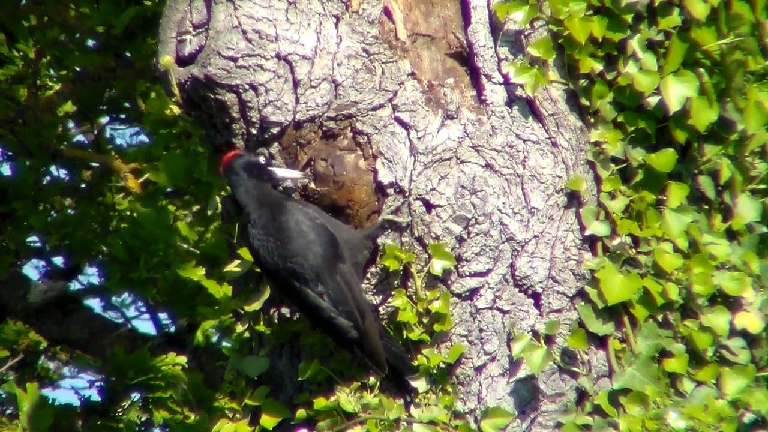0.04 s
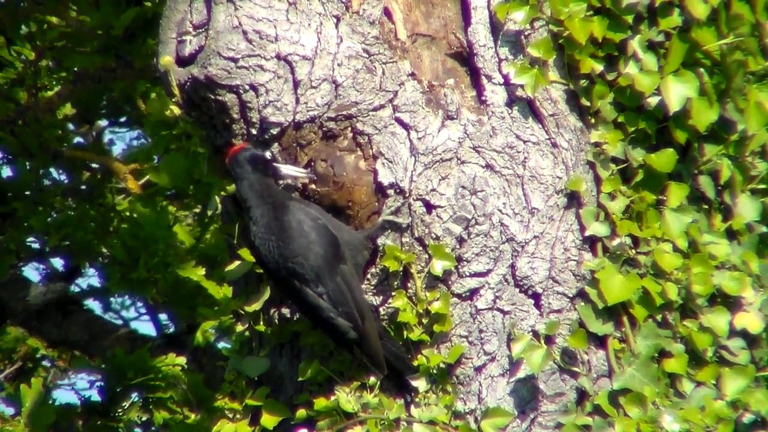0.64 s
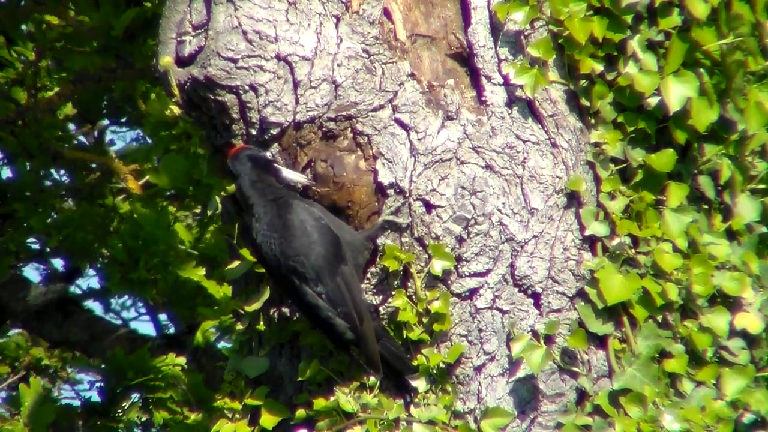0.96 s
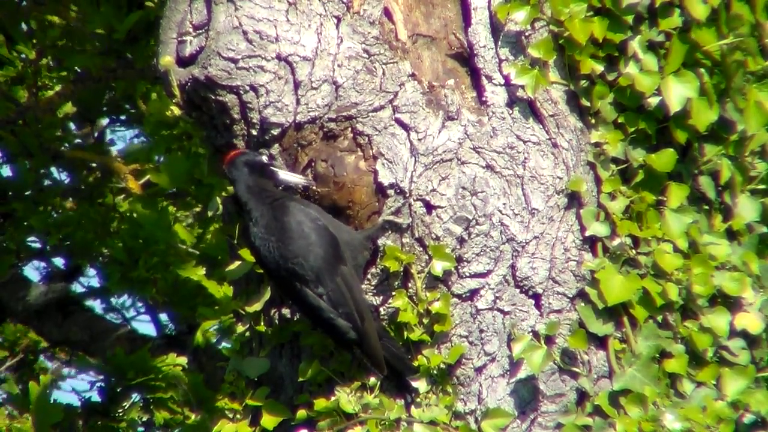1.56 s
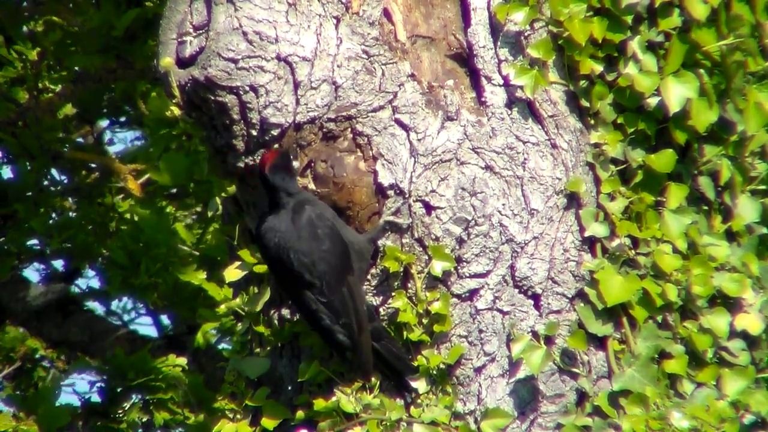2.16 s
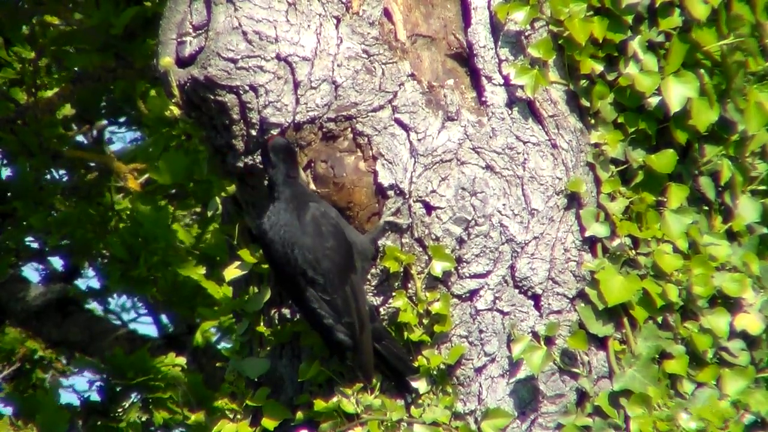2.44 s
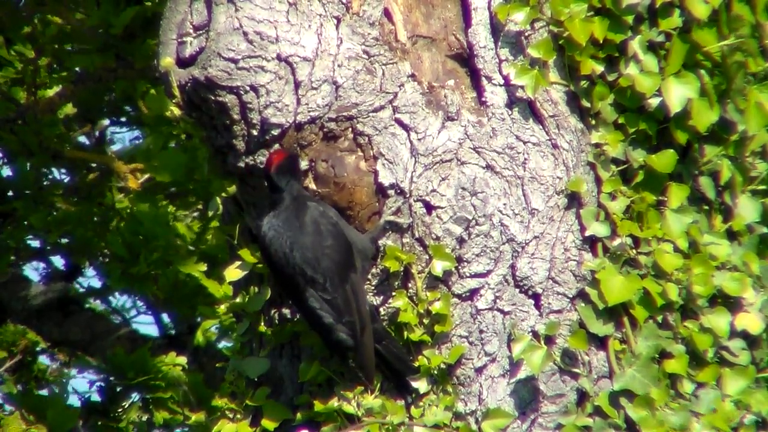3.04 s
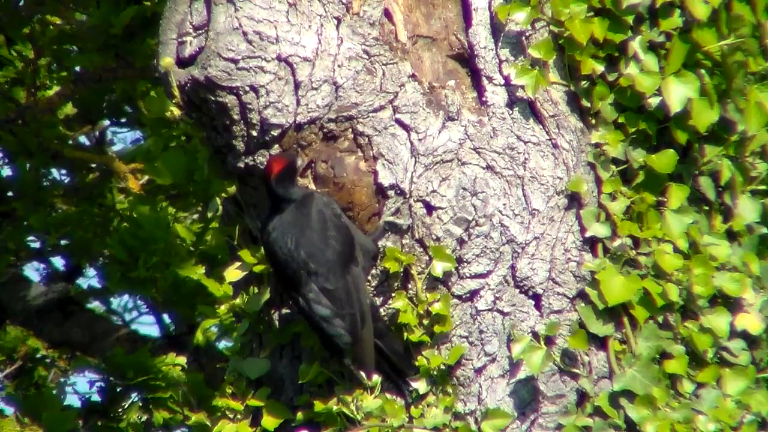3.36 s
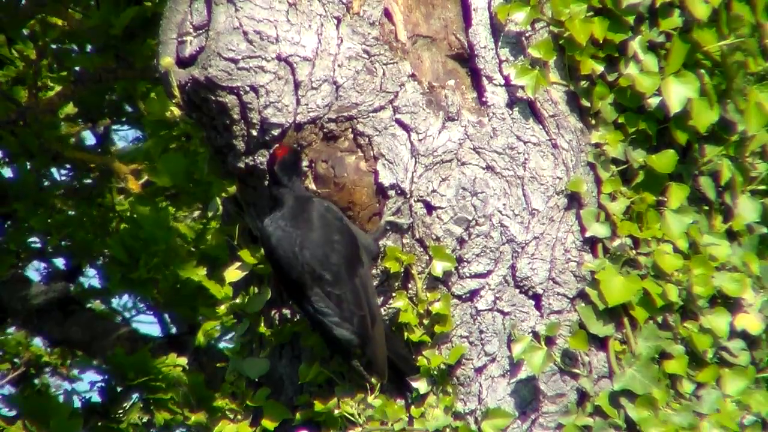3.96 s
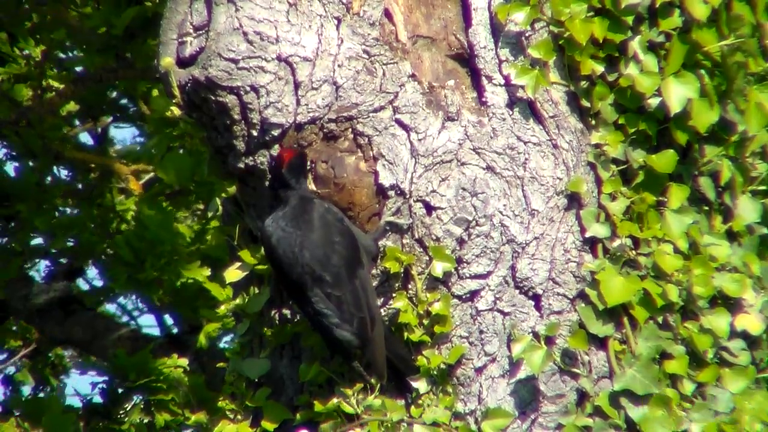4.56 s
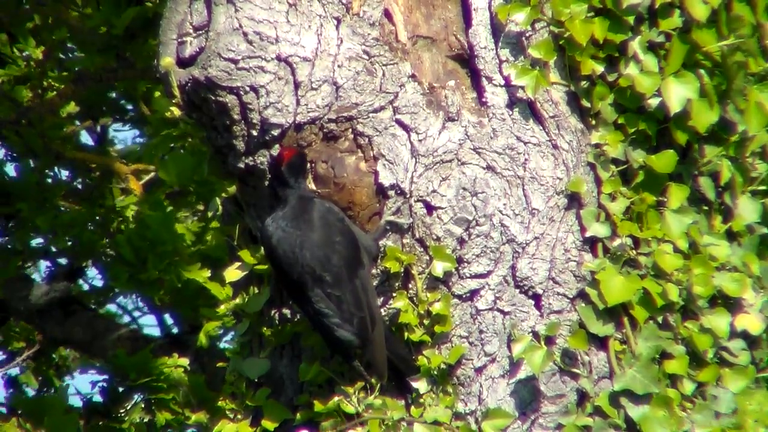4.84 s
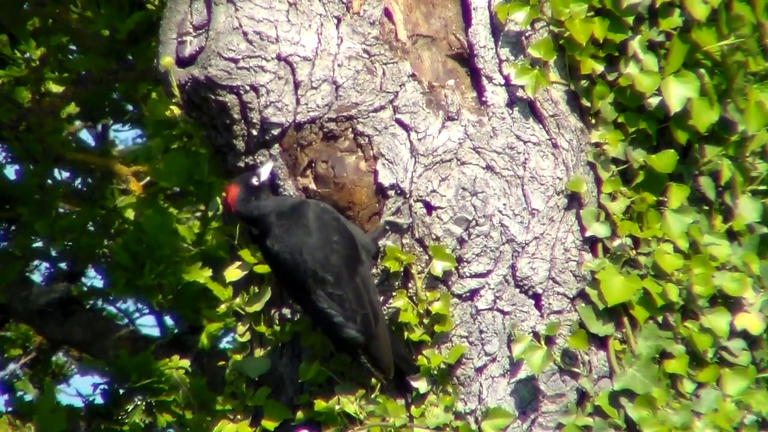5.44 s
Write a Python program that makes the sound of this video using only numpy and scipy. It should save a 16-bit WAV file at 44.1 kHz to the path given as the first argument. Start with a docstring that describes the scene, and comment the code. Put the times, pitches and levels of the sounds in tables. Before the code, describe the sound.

Short buzzy chirps and distant bird whistles over a low outdoor rumble, followed by a rapid, scratchy scolding chatter fading into the trees.

```python
"""A leafy garden, over a low rumble and a faint hum. From the start a small bird repeats buzzy chirps,
each note an arch of pitch that flares in its throat resonance, while other birds whistle far off.
Near 2 s comes one faint hoot. From 3.8 s a bird scolds in dry, harsh bursts of syrinx pulses; as it
slows and recedes, a diffuse wash of the chatter's echo swells and settles over faint far birdsong.
Leaves and trees scatter the chirps, whistles and chatter into a soft tail."""
import sys
import numpy as np
from scipy import signal
from scipy.fft import rfft, irfft, next_fast_len
from scipy.io import wavfile
from scipy.ndimage import uniform_filter1d, map_coordinates

SR = 44100
rng = np.random.default_rng(int(sys.argv[2]) if len(sys.argv) > 2 else 0)


def output_pcm(signal):
    """Save a mono or channel-first signal as 16-bit PCM at the path in sys.argv[1].

    Samples are clipped to [-1, 1] before scaling.
    """
    pcm = np.clip(np.atleast_2d(signal).T, -1, 1) * 32767
    wavfile.write(sys.argv[1], SR, np.round(pcm).astype(np.int16))


N = 247401

# tone of the outdoor rumble and hiss [f/Hz, relative level/dB]
AIR_EQ = [(12, -28), (20, -12), (43, -2), (110, -4), (154, -8), (739, -14), (1390, -17.5), (2170, -16),
          (3560, -24.5), (4200, -12.5), (4560, -15), (5380, -24.5), (8360, -24.5), (12000, -25),
          (14500, -31)]
# partials of the low hum [f/Hz, level/dB]
HUM_PARTIALS = [(25, -55.5), (50, -62), (100, -67.5)]
# tone of the noise wash that plays faint far birdsong and the chatter's echo [f/Hz, relative level/dB]
WASH_EQ = [(1500, -40), (2400, -2.5), (3400, 3), (4400, -2.5), (5600, 0), (6800, -14), (9000, -19)]
# fader ride on the wash; the swell near 4.5 s is the chatter's diffuse echo [t/s, relative level/dB]
WASH_RIDE = [(0, -47.5), (2.8, -47.5), (3.6, -46.5), (4.45, -38.5), (5.0, -45), (5.6, -48.5)]
# stereo image of the noise beds [f/Hz, left-right likeness]
BED_LIKENESS = [(30, 0), (60, 0.46), (130, 0.27), (300, 0.34), (700, 0.4), (1400, 0.37), (3500, 0.56),
                (7000, 0), (14000, 0)]
# stereo image of the reverb [f/Hz, left-right likeness]
TAIL_LIKENESS = [(1400, 0.76), (3500, 0.35), (5000, 0.46), (7000, -0.73)]
# reverb time among the trees [f/Hz, t60/s]
TREE_DECAY = [(1000, 0.4), (4000, 0.58), (7000, 0.85), (12000, 0.19)]
# slaps off the trunk and the ground [delay/s, level/dB, side -1..1]
SLAPS = [(0.0142, -16, 0.22), (0.0238, -11, 0.07)]
# phase gap between the two microphone ports [f/Hz, phase/rad]
PORT_PHASE = [(1000, .08), (3500, 0.1), (5000, 0.9), (6300, 1.15), (7500, 1.33), (9000, 2), (12000, 1.34)]
# lean of the direct sound [f/Hz, left over right/dB]
LEFT_LEAN = [(1000, 1.5), (4000, 0.1), (8000, 0.3), (12000, 3)]
# the clearest far whistles [t/s, length/s, first f/Hz, middle f/Hz, last f/Hz, relative level/dB]
CLEAR_WHISTLES = [ (0.235, 0.056, 3410, 2670, 1970, -55), (.355, 0.072, 2590, 2494, 2490, -50),
                  (0.534, .18, 3230, 2295, 1950, -56.5), (0.799, .14, 3650, 3320, 2435, -48.5),
                  (1.225, .15, 1950, 1933, 1880, -60.5), (1.736, .11, 3800, 3386, 3750, -43),
                  (1.857, .08, 6020, 5520, 5500, -52), (2.679, .065, 4200, 3775, 2840, -46),
                  (3.045, 0.23, 2040, 2288, 2444, -55.5), (3.189, .17, 1600, 1687, 1656, -58),
                  (3.242, 0.079, 2590, 2558, 2556, -45), (3.436, .092, 3450, 3040, 2770, -39.5),
                  (3.67, .26, 1730, 1852, 2170, -55.5), (4.515, 0.088, 3630, 3633, 3630, -37.5),
                  (4.668, .075, 2640, 3100, 2730, -42.5), (4.733, 0.097, 2650, 2500, 2640, -46.5),
                  (5.278, 0.125, 3596, 3526, 3470, -50), (5.389, .042, 4590, 3590, 2360, -50),
                  (5.543, .04, 4530, 3700, 2920, -47), ]
# the chirping bird's five notes by name
# [rise/s, hold/s, top f/Hz, dip as share of the top, rebound 0-1, accent/dB, trim/dB]
NOTE_SHAPES = { "high": (.018, .021, 4900, .72, .55, 6.5, .8),
               "hook": (.022, .004, 4600, .71, .65, 8.5, -.5), "tail": (.022, 0, 4350, .85, 0, 0, -2),
               "peak": (.02, .007, 4980, .76, .15, 2, .3), "drop": (.02, 0, 4350, .77, .1, 4.5, -1.3), }
# the notes of each phrase [note names in order]
PHRASE_NOTES = {"long": ["high", "hook", "tail"], "short": ["peak", "drop"]}
# chirps, cued where the first note turns down
# [t/s, phrase, relative level/dB, pitch ratio, relative level of the lead-in buzz/dB]
CHIRP_CUES = [ (-.034, "short", -34.5, 1.057, -55), (.197, "long", -32, 1, -41),
              (.608, "short", -33, 1.003, -51), (.923, "long", -33.5, 0.98, -45.5),
              (1.25, "short", -32.5, 1.03, -51.5), (1.508, "long", -33.3, .98, -37.5),
              (2.206, "short", -34, 0.98, -57), (3.073, "long", -32, .985, -38),
              (3.478, "long", -31, 0.97, -36), (3.646, "short", -29, 1.036, -48), ]
# beak colour on the chirps' overtones [f/Hz, gain/dB]
BEAK_EQ = [(6000, -9), (7400, -8.5), (8500, -22), (9600, -3.5), (11000, -1), (13000, -10)]
# tone of the hiss on the chirps [f/Hz, relative level/dB]
SIZZLE_EQ = [(1200, -8), (2000, 0), (5000, 5.5), (7300, 4), (8600, -3), (10000, 3), (12500, -19),
             (14000, -21)]
# starts of the chatter notes, growing slower and less even [t/s]
CHATTER_CUES = [3.772, 3.812, 3.858, 3.903, 3.948, 3.997, 4.053, 4.107, 4.162, 4.233, 4.294, 4.346, 4.415,
                4.488, 4.552, 4.611, 4.684, 4.76, 4.888, 4.928, 5.006, 5.062, 5.133, 5.221, 5.278, 5.369,
                5.444, 5.552]
# the scolding throat, close and in the open [f/Hz, relative level/dB]
OPEN_EQ = [(450, -17), (750, -5.5), (1150, -5), (1600, -8), (1950, -7.5), (2400, -3.5), (3200, -9),
           (4300, -3), (5700, -0.5), (6500, -1), (7900, -0.5), (8900, -11), (11500, -5.5), (14000, -28)]
# the same voice, muffled deep in the trees [f/Hz, relative level/dB]
DEEP_EQ = [(500, -25), (1000, -9), (1600, -8.5), (2200, -7.5), (3000, 1.5), (4200, 0), (5500, 3.5),
           (6300, -3), (7500, -16), (9000, -14), (12000, -33), (14000, -40)]
# the scolding swells, then recedes [t/s, relative level/dB, depth in the trees 0-1]
SCOLD_RIDE = [(3.77, -49, 0.14), (3.85, -32, 0.38), (4.13, -23.5, 0.01), (4.24, -28.5, 0.44),
              (4.56, -35.5, 0.83), (5.03, -38, 1), (5.45, -44.5, 0.85)]


def amp(db):
    """Decibels to gain."""
    return 10 ** (np.asarray(db) / 20)


def unit(x):
    """Scale to rms 1."""
    return x / np.sqrt(np.mean(x ** 2) + 1e-20)


def along(points, hz):
    """Read a curve of (f/Hz, value) points on a log frequency axis."""
    freqs, values = np.transpose(points)
    return np.interp(np.log(hz + 1), np.log(freqs + 1), values)


def wobble(rate, size):
    """A smooth random modulator, rate knots a second."""
    knots = rng.standard_normal(int(size * rate / SR) + 4)
    return map_coordinates(knots, [np.arange(size) * rate / SR])


def filtered(x, response):
    """Shape x by a gain that is a function of frequency."""
    size = x.shape[-1]
    padded = next_fast_len(size + 2048)
    return irfft(rfft(x, padded) * response(np.fft.rfftfreq(padded, 1 / SR)), padded)[..., :size]


def eq(x, curve):
    """Equalise by a curve of (f/Hz, gain/dB) points."""
    return filtered(x, lambda hz: amp(along(curve, hz)))


def add(track, s, sound):
    """Mix a sound in at time s."""
    i = round(s * SR)
    sound = sound[..., max(-i, 0):max(N - i, 0)]
    track[..., max(i, 0):max(i, 0) + sound.shape[-1]] += sound


def phase_of(hz):
    """Running phase of a pitch curve."""
    return 2 * np.pi * np.cumsum(hz) / SR


def spread(pair, likeness):
    """Two unrelated signals become left and right of the given likeness."""
    turn = lambda hz: np.arccos(np.clip(along(likeness, hz), -1, 1)) / 2
    mid, side = filtered(pair, lambda hz: np.array([np.cos(turn(hz)), np.sin(turn(hz))]))
    return np.array([mid + side, mid - side])


def noise_bed(colour, patchy_db):
    """Stereo noise of rms 1, mottled with patches of random gain."""
    bins = signal.stft(rng.standard_normal((2, N)), nperseg=1024)[2]
    patches = uniform_filter1d(rng.standard_normal(bins.shape[1:]), size=4, axis=0)
    patches = uniform_filter1d(patches, size=7, axis=1)
    pair = signal.istft(bins * amp(patchy_db * unit(patches)), nperseg=1024)[1][:, :N]
    return unit(eq(spread(pair, BED_LIKENESS), colour))


def ambience(air_db=-53, wash_trim_db=-4):
    """The bed: low hum, outdoor rumble and hiss, and a noise wash ridden up as the chatter's echo."""
    hum = sum(amp(db) * np.sqrt(2) * np.sin(phase_of(hz * (1 + 0.0055 * wobble(5.12, N))))
              for hz, db in HUM_PARTIALS)
    ride_db = np.interp(np.arange(N) / SR, *np.transpose(WASH_RIDE))
    wash = amp(wash_trim_db + ride_db) * noise_bed(WASH_EQ, patchy_db=7)
    return amp(air_db) * noise_bed(AIR_EQ, patchy_db=1.5) + wash + hum


def foliage_reverb(x, decay, onset_s):
    """Scatter off foliage: a noise tail that builds over onset_s and dies band by band."""
    hz, t, bins = signal.stft(rng.standard_normal((2, SR * 2 // 3)), SR, nperseg=128)
    bins = bins * amp(-60 * t / along(decay, hz)[:, None]) * (1 - np.exp(-t / onset_s))
    tail = spread(signal.istft(bins, SR, nperseg=128)[1], TAIL_LIKENESS)
    return signal.fftconvolve(x[None], tail / np.linalg.norm(tail[0]), axes=1)[:, :N]


def slapback(x):
    """Trunk and ground each throw the sound back once, a moment later."""
    out = np.zeros((2, N))
    for delay, db, side in SLAPS:
        add(out, delay, amp(db) * np.array([[1 + side], [1 - side]]) * x)
    return out


def direct_path(x):
    """The straight path reaches the two microphone ports out of step, the left a little louder."""
    half = np.array([[.5], [-.5]])
    lean = lambda hz: amp(half * along(LEFT_LEAN, hz))
    return filtered(x, lambda hz: np.exp(1j * half * along(PORT_PHASE, hz)) * lean(hz))


def hoot(start_s=1.88, length_s=.5, pitch_hz=563, level_db=-65):
    """One soft, far hoot on a nearly steady pitch."""
    out = np.zeros(N)
    u = np.linspace(0, 1, int(length_s * SR))
    pitch = pitch_hz * (1 + 0.0054 * wobble(21, len(u)))
    envelope = amp(level_db) * np.sqrt(2 * np.abs(np.sin(np.pi * u)))
    add(out, start_s, envelope * np.sin(phase_of(pitch)))
    return out


def faint_whistle_cues(count=12, length_s=.048, pitch_hz=3070, slide_oct=-.6):
    """Faint whistles strewn over the scene, most sliding down; rows as in CLEAR_WHISTLES."""
    starts = (np.arange(count) + rng.random(count)) * N / SR / count
    rows = []
    for s, (long, high, steep, loud) in zip(starts, rng.standard_normal((count, 4))):
        hz = pitch_hz * 2 ** (.25 * high)
        slide = 2 ** ((slide_oct + .25 * steep) / 2)
        rows.append((s, length_s * np.exp(.25 * long), hz / slide, hz, hz * slide, -54.5 + 2 * loud))
    return rows


def whistles(waver=0.0081, hoarse=0.014, flutter_db=3.5):
    """Far songbirds: each note bends through three pitches, a little hoarse and unsteady."""
    out = np.zeros(N)
    for s, length, first, middle, last, db in CLEAR_WHISTLES + faint_whistle_cues():
        u = np.linspace(0, 1, int(length * SR))
        bend = np.polyval(np.polyfit([0, .5, 1], [first, middle, last], 2), u)
        pitch = bend * (1 + waver * wobble(193, len(u)) + hoarse * wobble(891, len(u)))
        envelope = amp(db + flutter_db * wobble(120.6, len(u))) * np.sqrt(2 * np.abs(np.sin(np.pi * u)))
        add(out, s, envelope * np.sin(phase_of(pitch)))
    return out


def chirp_notes(step_s=.056):
    """Every chirp unrolled into evenly spaced notes [t/s, shape, relative level/dB, pitch ratio]."""
    return [(s + k * step_s, NOTE_SHAPES[name], db + NOTE_SHAPES[name][-1], ratio)
            for s, phrase, db, ratio, _ in CHIRP_CUES for k, name in enumerate(PHRASE_NOTES[phrase])]


def sizzle(trim_db=-22, length_s=0.082):
    """A thin hiss rides on every chirp note."""
    out = np.zeros(N)
    u = np.linspace(0, 1, int(length_s * SR))
    for s, _, db, _ in chirp_notes():
        hiss = unit(eq(rng.standard_normal(len(u)), SIZZLE_EQ))
        add(out, s - length_s / 2, amp(db + trim_db) * np.sin(np.pi * u) * hiss)
    return out


def buzzes(octave_hz=6244, length_s=.06, overlap_s=.009, rough=0.056, climb=0.065, trim_db=-1):
    """A rough, rising squeeze leads into each chirp; its octave is stronger than its fundamental."""
    out = np.zeros(N)
    u = np.linspace(0, 1, int(length_s * SR))
    for s, phrase, _, _, db in CHIRP_CUES:
        rise, hold = NOTE_SHAPES[PHRASE_NOTES[phrase][0]][:2]
        phase = phase_of(octave_hz * (1 + climb * (u - .5) + rough * wobble(2602, len(u))))
        buzz = unit(np.sin(phase) + amp(-11) * np.sin(phase / 2))
        start = s - rise - hold - length_s + overlap_s
        add(out, start, amp(db + trim_db) * np.sin(np.pi * u ** 1.4) * buzz)
    return out


def arch(rise, hold, top_hz, dip, rebound, fall_s=0.00671, rebound_s=0.00688, sag_s=0.0129):
    """Time from the turn and pitch of one note: it rises, holds, falls, springs back and sags."""
    knots = np.cumsum([0, rise, hold, fall_s, rebound_s, sag_s]) - rise - hold
    t = np.arange(knots[0], knots[-1], 1 / SR)
    share_of_top = np.interp(t, knots, [.73, 1, 1, dip, dip + rebound * (1 - dip), dip - 0.089])
    return t, top_hz * uniform_filter1d(share_of_top, size=160)


def chirps(throat_hz=3860, width_hz=520, throat_db=3.5, swell_db_per_s=179, decay_db_per_s=97):
    """The fundamental flares as it sweeps through the throat resonance; overtones flicker above it."""
    tones, highs = np.zeros(N), np.zeros(N)
    for s, (rise, hold, top_hz, dip, rebound, accent_db, _), db, ratio in chirp_notes():
        t, hz = arch(rise, hold, top_hz * ratio, dip, rebound)
        phase = phase_of(hz * (1 + 0.014 * wobble(499, len(t))))
        ring_db = throat_db * (np.exp(-((hz - throat_hz) / width_hz) ** 2) - 1)
        push_db = accent_db * np.exp(-((t - 0.0028) / 0.0033) ** 2)  # a push during the fall
        swell_db = np.minimum(swell_db_per_s * t, -decay_db_per_s * t)  # peaks at the turn
        edges = np.clip(np.minimum(t - t[0], t[-1] - t) / 0.0021, 0, 1)
        envelope = np.sqrt(2) * edges * amp(db + 3 * wobble(380, len(t)))
        rasp = amp(-18) * wobble(1800, len(t))  # noisy sidebands that follow the pitch
        add(tones, s + t[0], envelope * (amp(ring_db + push_db + swell_db) + rasp) * np.sin(phase))
        overtones = amp(-21) * np.sin(2 * phase) + amp(-32) * np.sin(3 * phase)
        add(highs, s + t[0], envelope * amp(4 * wobble(250, len(t))) * overtones)
    return tones + eq(highs, BEAK_EQ)


def chatter(pitch_hz=1620, shake_hz=185, length_s=.033, scatter_open=0.025, scatter_deep=0.39):
    """Bursts of sharp syrinx pulses, shaken fast in pitch and strength: clear and scattered stems."""
    clear, scattered = np.zeros(N), np.zeros(N)
    times, levels, depths = np.transpose(SCOLD_RIDE)
    for s in CHATTER_CUES:
        db, depth = np.interp(s, times, levels), np.interp(s, times, depths)
        size = int(length_s * (1 + 0.27 * depth ** 2) * SR)  # deeper notes are drawn out
        swell = np.abs(np.sin(np.pi * np.linspace(0, 1, size) ** 0.6)) ** 1.24
        shake_phase = phase_of(shake_hz * (1 + 0.266 * wobble(120.9, size)))
        shake = np.sin(shake_phase + rng.uniform(0, 2 * np.pi))
        jitter = 0.0803 * wobble(148.7, size) + 0.05 * wobble(1415, size)
        phase = phase_of(pitch_hz * (1 + 0.16 * shake + jitter))
        # the overtones swell and fade on their own, which gives the scratch
        pulses = unit(sum(amp(3.5 * wobble(250, size)) * np.cos(k * phase) for k in range(1, 10)))
        source = (pulses + 0.19 * rng.standard_normal(size)) * (1 + 0.36 * shake)
        colour = lambda hz: amp((1 - depth) * along(OPEN_EQ, hz) + depth * along(DEEP_EQ, hz))
        note = amp(db) * swell * unit(filtered(source, colour))
        share = scatter_open + depth * (scatter_deep - scatter_open)  # what the leaves scatter
        add(clear, s, np.sqrt(1 - share) * note)
        add(scattered, s, np.sqrt(share) * note)
    return clear, scattered


def scene():
    """The mix: near leaves give the calls a quick scatter, the farther trees a long soft tail."""
    song = chirps() + buzzes() + sizzle()
    far = whistles()
    clear, scattered = chatter()
    direct = direct_path(song + clear + amp(-0.5) * far)
    leaf_send = amp(-10) * song + scattered + amp(-7) * far
    tree_send = amp(-13) * song + amp(-19) * clear + amp(-14.5) * scattered + amp(-8.5) * far
    leaves = foliage_reverb(leaf_send, [(2000, 0.16), (10000, 0.12)], onset_s=0.0013)
    trees = foliage_reverb(tree_send, TREE_DECAY, onset_s=0.0087)
    return direct + slapback(song) + leaves + trees + hoot() + ambience()


def record(dry, top_hz=14500):
    """A brick-wall low-pass on the whole mix."""
    return filtered(dry, lambda hz: hz < top_hz)


dry = scene()
out = record(dry)
output_pcm(out)
```